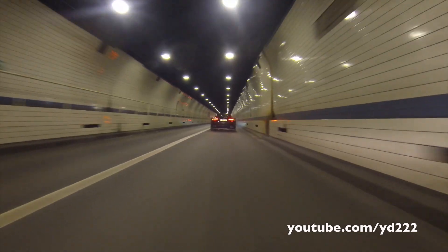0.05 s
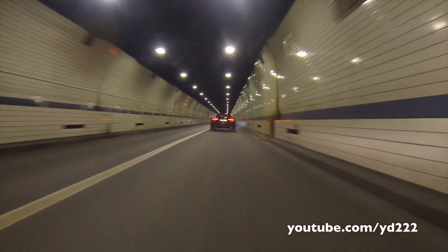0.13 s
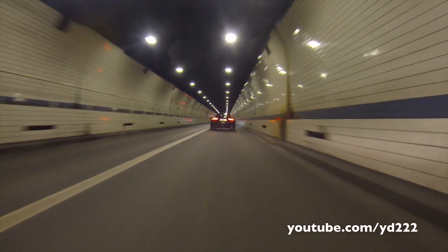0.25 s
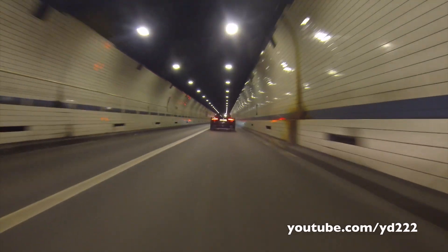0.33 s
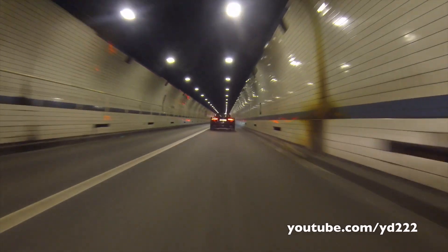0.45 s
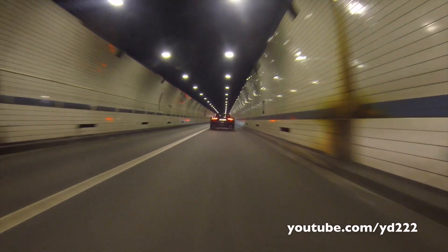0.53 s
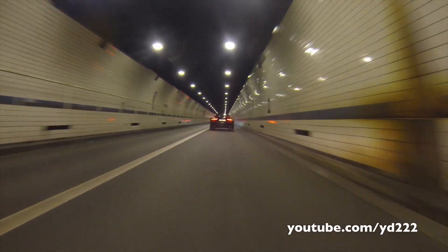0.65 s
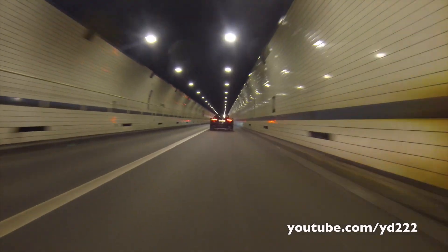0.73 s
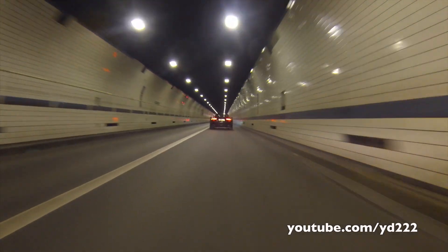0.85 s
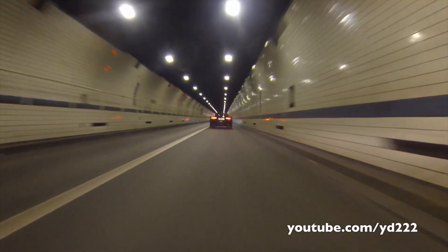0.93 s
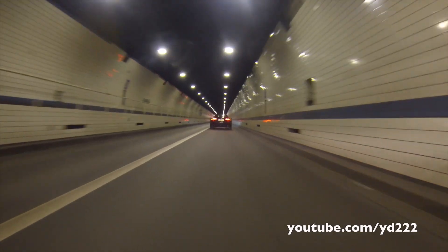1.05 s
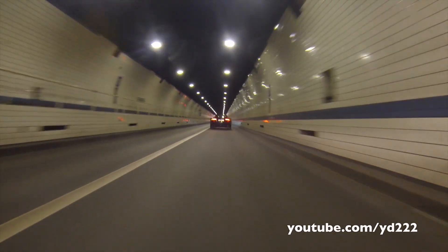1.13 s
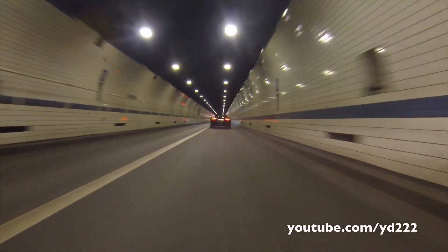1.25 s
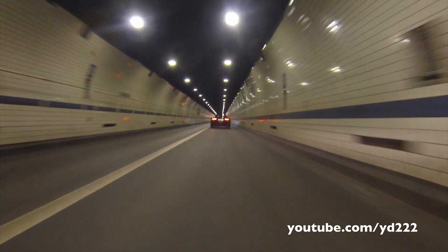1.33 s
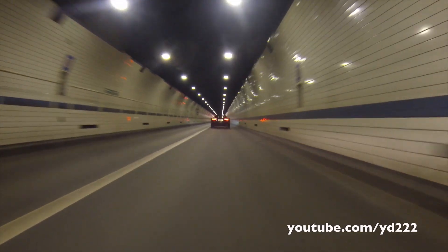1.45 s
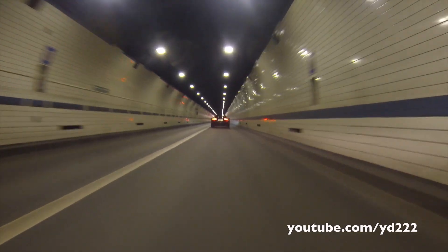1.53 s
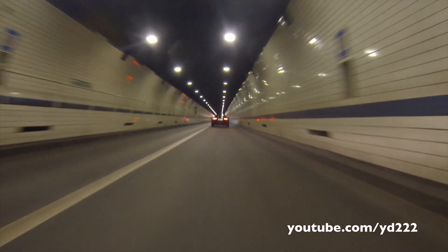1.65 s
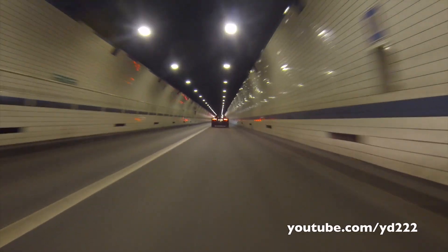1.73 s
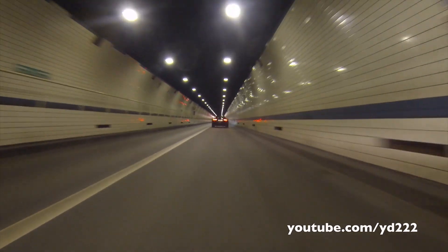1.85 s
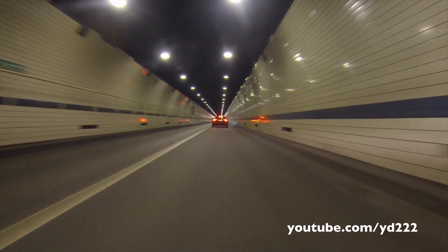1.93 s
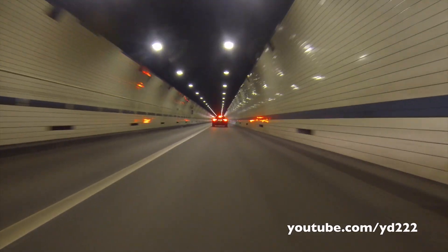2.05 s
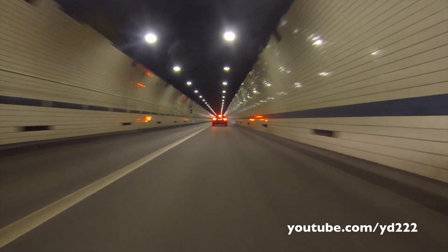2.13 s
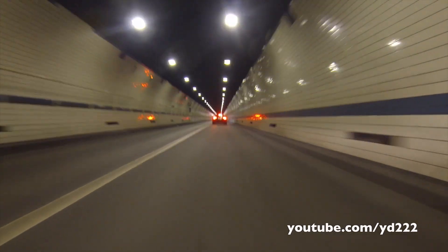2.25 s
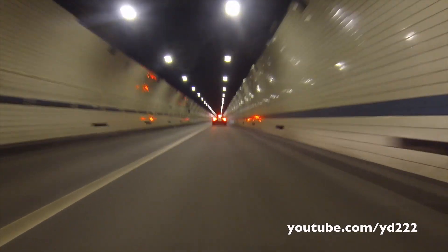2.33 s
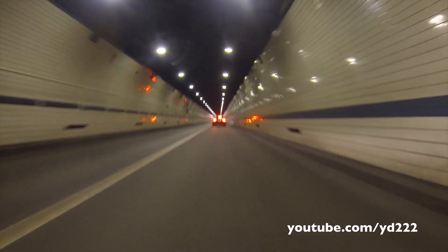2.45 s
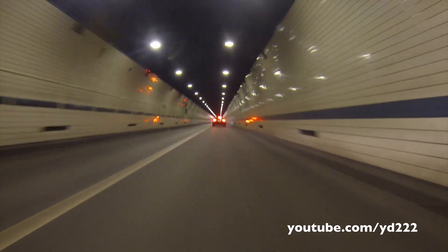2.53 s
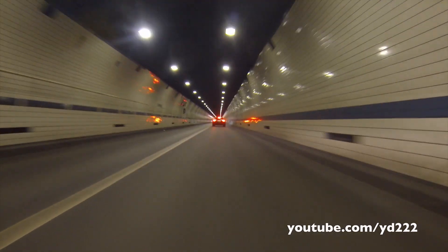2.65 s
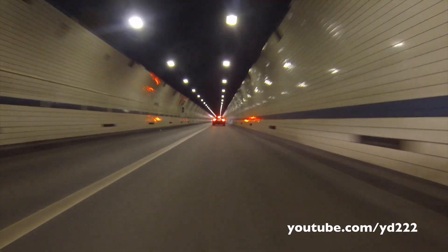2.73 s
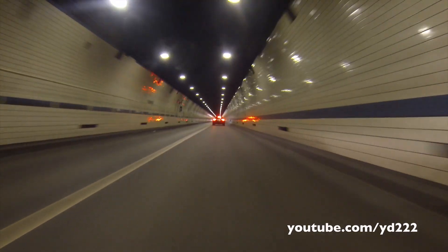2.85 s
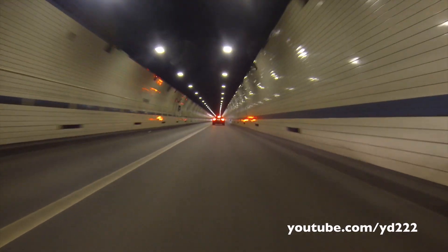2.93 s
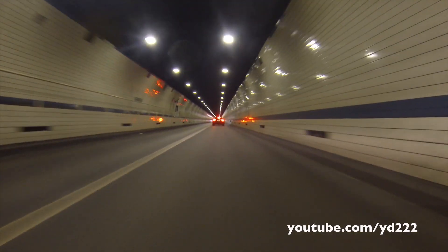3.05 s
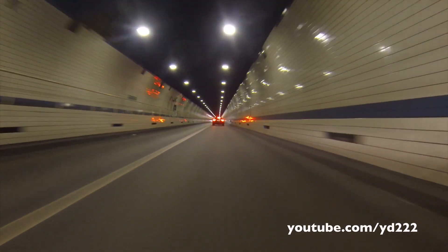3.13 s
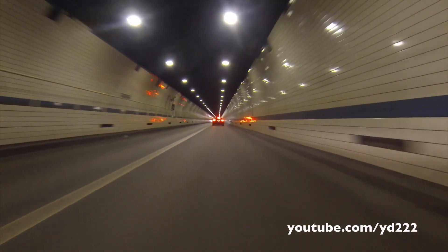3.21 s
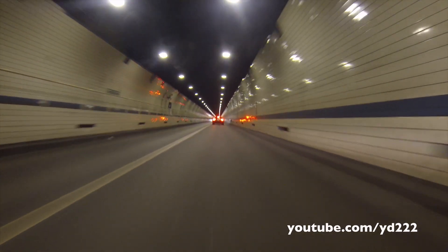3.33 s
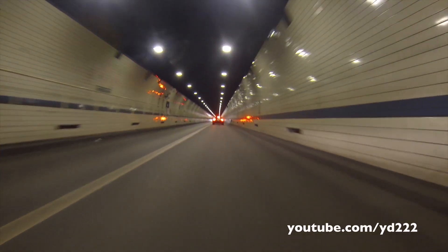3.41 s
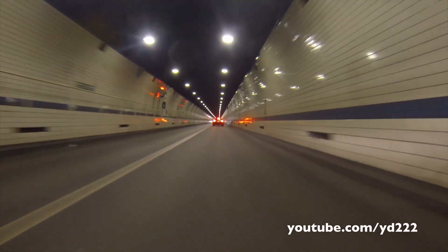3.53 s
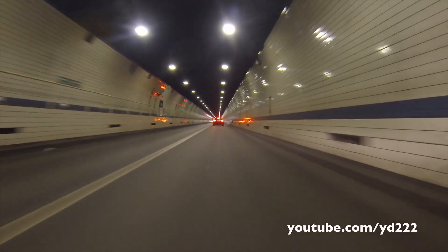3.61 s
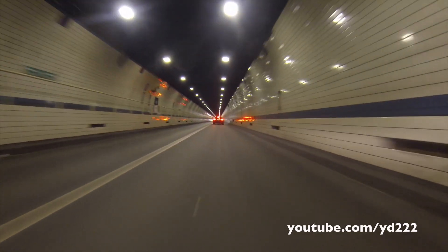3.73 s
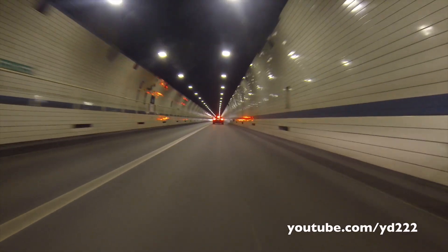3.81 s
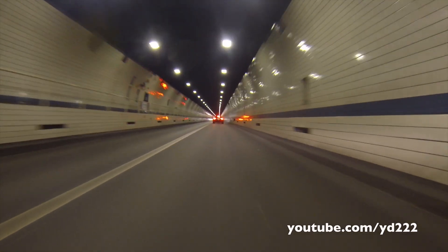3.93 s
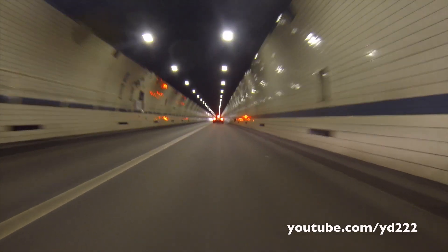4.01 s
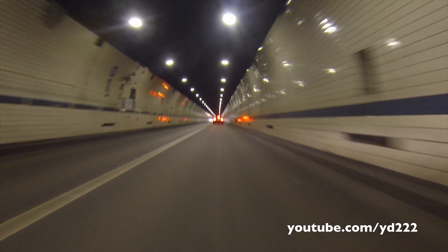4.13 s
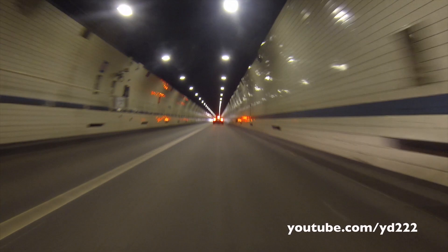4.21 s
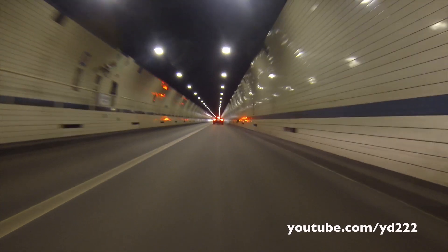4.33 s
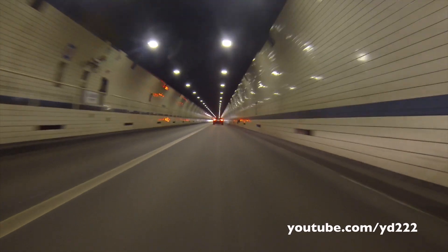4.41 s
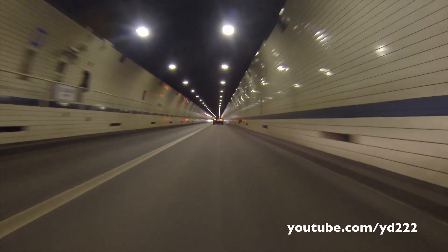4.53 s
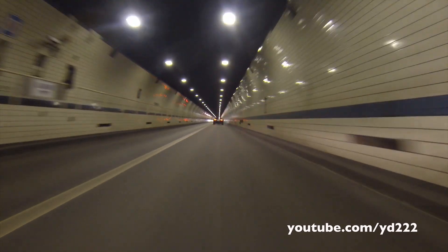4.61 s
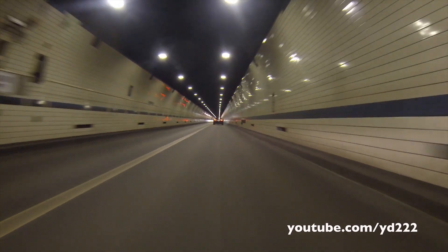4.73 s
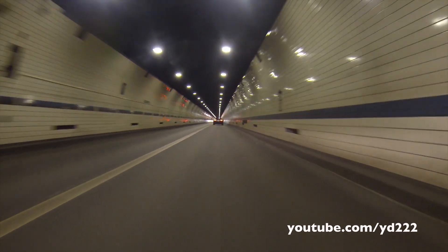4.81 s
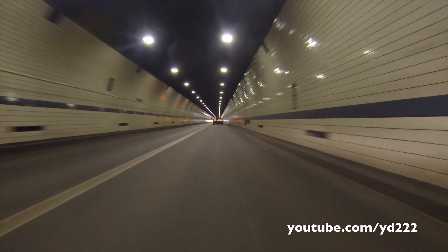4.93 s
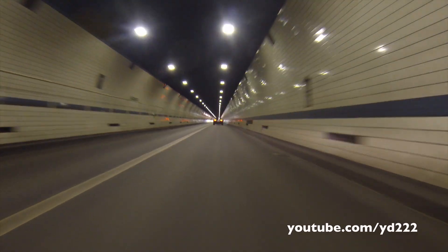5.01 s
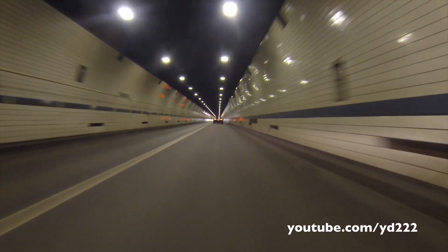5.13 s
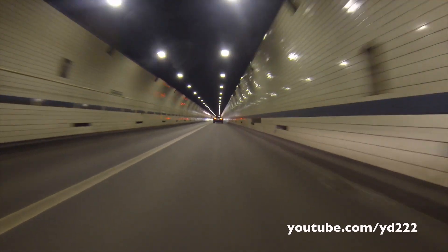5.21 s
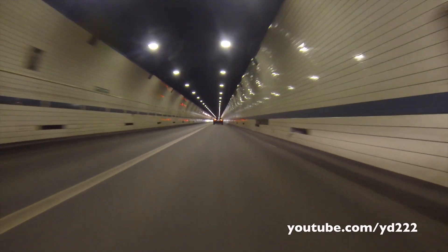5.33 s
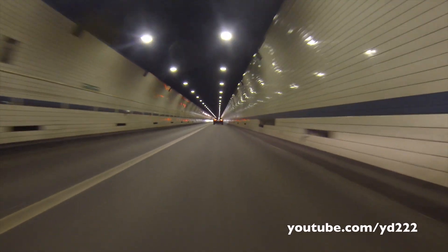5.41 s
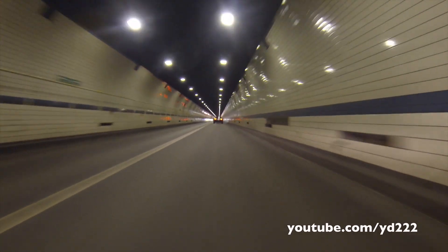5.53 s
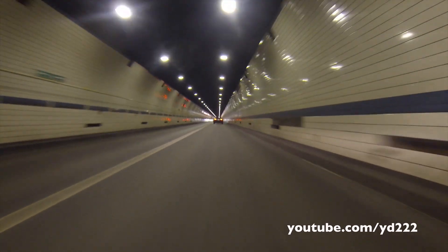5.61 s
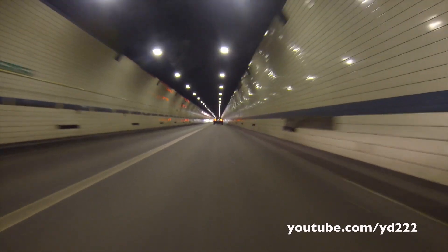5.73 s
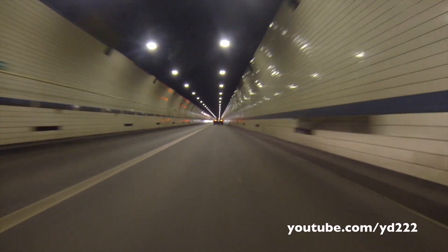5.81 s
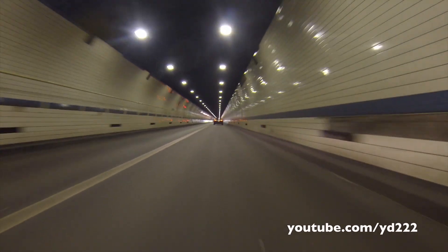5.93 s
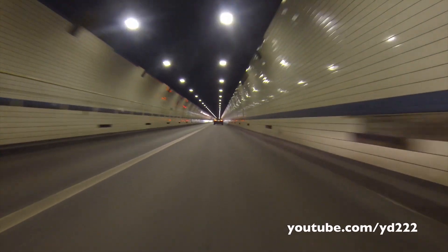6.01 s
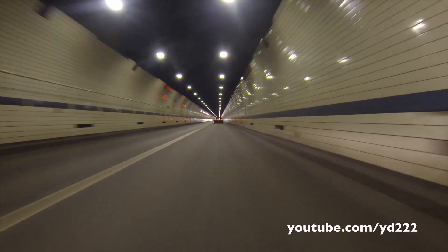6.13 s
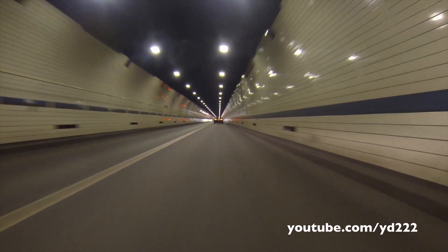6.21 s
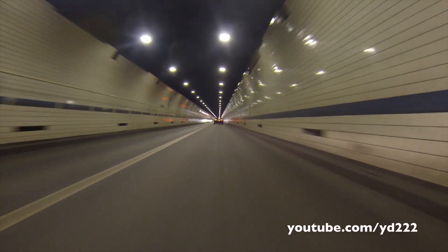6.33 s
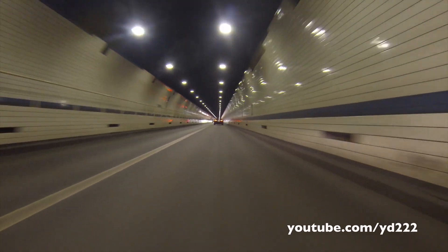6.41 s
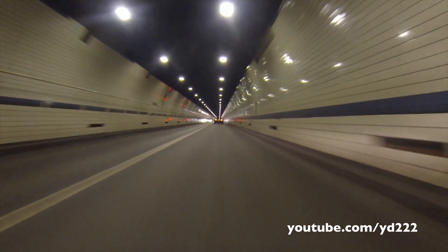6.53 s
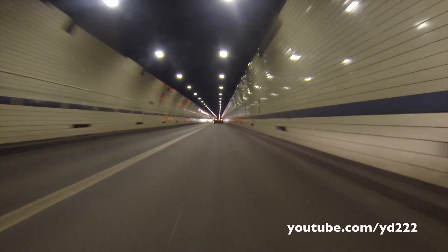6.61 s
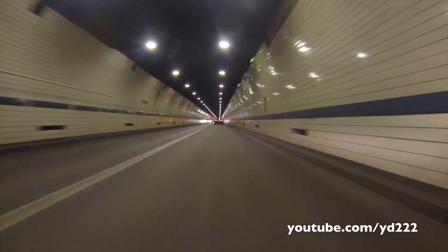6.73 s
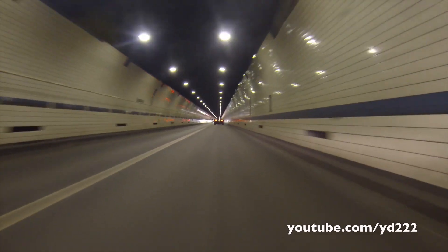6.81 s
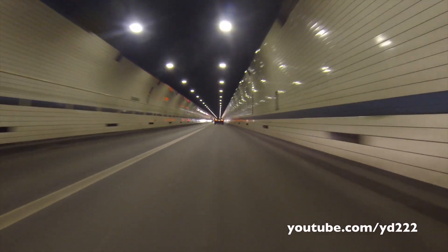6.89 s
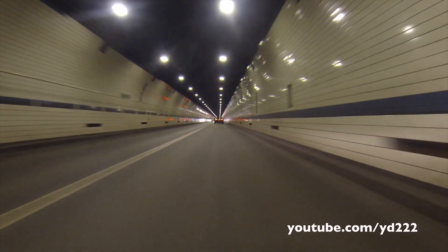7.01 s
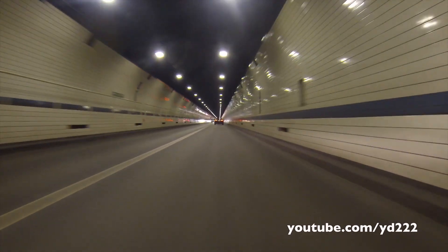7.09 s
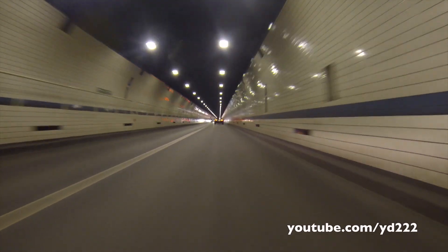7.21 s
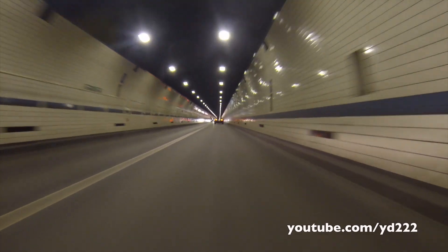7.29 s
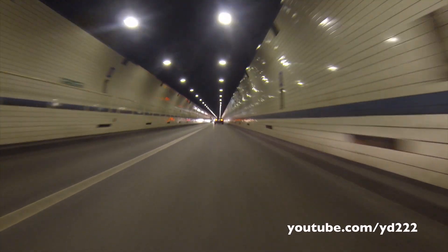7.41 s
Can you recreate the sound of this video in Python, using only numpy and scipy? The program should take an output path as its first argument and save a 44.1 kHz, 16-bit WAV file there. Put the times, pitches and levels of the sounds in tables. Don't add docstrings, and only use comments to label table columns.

```python
import sys
import numpy as np
from scipy import signal
from scipy.fft import rfft, irfft, next_fast_len
from scipy.io import wavfile
from scipy.ndimage import uniform_filter1d, map_coordinates

SR = 44100
rng = np.random.default_rng(int(sys.argv[2]) if len(sys.argv) > 2 else 0)


def ratio_of_db(decibels):
    return 10 ** (np.asarray(decibels, float) / 20)


def generate_wav(signal):
    frames = np.transpose(np.atleast_2d(signal))
    scaled = np.clip(frames, -1, 1) * 32767
    pcm = np.round(scaled).astype(np.int16)
    wavfile.write(sys.argv[1], SR, pcm)


N = 328967

# time in s, loudness in dB, harshness in dB.
EXHAUST_FLOW = [(0, -26.5, -22), (.08, -17, -15.5), (.16, -12, -13), (.33, -12.5, -9), (.57, -11.5, -12.5),
                (.88, -10, -14), (1.05, -10.5, -14), (1.16, -11, -11), (1.42, -11, -15.5), (1.52, -13, -17),
                (1.84, -12, -15.5), (2.04, -11, -14), (2.2, -13, -17.5), (2.4, -16, -19.5),
                (3.05, -25, -18), (3.8, -32.5, -18.5), (5, -45.5, -20), (7.46, -52, -20)]
# start in s, hold in s, boom level in dB.
ROAD_BUMPS = [(0.295, 0.25, -28), (.72, 0.035, -24), (0.9, .05, -23.5), (1.39, .33, -19.5),
              (2.155, 0.099, -23), (3.352, 0.39, -19.5), (3.947, 0.19, -20), (4.5, .51, -20.5),
              (5.21, 0.095, -23.5), (5.53, .11, -11), (5.922, 0.084, -17.5), (6.416, 0.15, -16.5),
              (6.708, 0.13, -20), (7.21, 0.028, -22)]


def unit(x):
    return x / np.sqrt(np.mean(x ** 2) + 1e-20)


def curves(rows):
    s, *columns = np.transpose(rows)
    t = np.arange(N) / SR
    return [np.interp(t, s, column) for column in columns]


def humps(rows):
    t = np.arange(N) / SR
    return sum(db * np.exp(-((t - s) / half_width_s) ** 2) for s, db, half_width_s in rows)


def gate(rows, fade_s):
    t = np.arange(N) / SR
    inside_s = np.minimum(t - rows[0][0], rows[-1][0] - t)
    return np.clip(inside_s / fade_s + 1, 0, 1)


def wobble(rate_hz):
    knots = rng.standard_normal(int(N * rate_hz / SR) + 4)
    return map_coordinates(knots, [np.arange(N) * rate_hz / SR])


def filtered(x, gain_of_hz):
    m = next_fast_len(N + 8192)
    hz = np.fft.rfftfreq(m, 1 / SR)
    return irfft(rfft(x, m) * ratio_of_db(gain_of_hz(hz)), m)[:N]


def coloured(x, spectrum):
    points_hz, db = np.transpose(spectrum)
    return unit(filtered(x, lambda hz: np.interp(np.log(hz + 1), np.log(points_hz), db, -120, -120)))


def rush(spectrum, patchy_db):
    z = signal.stft(rng.standard_normal(N + 512), nperseg=512)[2]
    field = uniform_filter1d(rng.standard_normal(z.shape), 5, 0)
    field = uniform_filter1d(field, 12, 1)
    noise = signal.istft(z * ratio_of_db(patchy_db * unit(field)), nperseg=512)[1][:N]
    return coloured(noise, spectrum)


def gear(speed, orders, load_db, fading_db, smear_rad):
    # time in s, firing tone in dB, other orders in dB above load_db.
    tone_levels = [(0, -28, -5), (.14, -17.5, -5.5), (.36, -27.5, -0.5), (.62, -29.5, -6.5), (.84, -21, -5),
                   (1.17, -25.5, -10.5), (1.27, -43, -7), (1.47, -22.5, -7), (1.7, -23, -4.5),
                   (1.92, -16.5, -2), (2.12, -18, -3.5), (2.4, -28, -5), (2.7, -38, -13.5), (3.2, -39, -5),
                   (3.8, -36, 7), (5.0, -39.5, -1.5), (5.6, -29, -3), (7.46, -30, 1)]
    # time in s, depth in dB, half width in s.
    nulls = [(.08, 18, 0.03), (.52, 9, 0.053), (1.44, 4, 0.028), (1.68, 0, 0.028), (1.88, 21, 0.022),
             (2.0, 20, 0.035), (2.2, 20, 0.045), (2.62, 8, 0.054), (3.67, 11, 0.056), (4.01, 5, 0.091),
             (4.41, 7, 0.039), (4.91, 5, 0.033), (5.16, 15, 0.042), (5.95, 21, 0.083), (6.46, 15, 0.11),
             (6.78, 11, 0.037), (7.29, 3.5, 0.29)]
    # frequency in Hz, gain in dB.
    case_lift = [(900, -1.5), (1000, -8), (1080, 7), (1150, 6.5), (1300, 1.5), (1450, 10.5), (1650, 0),
                 (1800, -3)]
    focused_orders = [18, 14, 10, 12, 12, 10, 16, 15, 22, 23, 27]
    # time in s, gain in dB, half width in s.
    focus = [(.32, 3.8, 0.12), (.4, 5, 0.12), (.3, 7.1, 0.17), (.56, 5.6, .1), (2.4, 4, 0.16),
             (5.0, 16, .35), (6.7, 13, .22), (7.1, 17, .25), (.62, 5, .15), (.55, 5, .12), (1.95, 5, .15)]
    (cycle_hz,), (firing_db, others_db) = curves(speed), curves(tone_levels)
    turn = 2 * np.pi * np.cumsum(cycle_hz) / SR
    firing_gain = ratio_of_db(firing_db - humps(nulls) + 2.6 * wobble(16))
    firing = firing_gain * np.sqrt(2) * np.sin(8 * turn + 0.5 * wobble(17))
    others = np.zeros(N)
    for order, db in orders:
        case_db = np.interp(order * cycle_hz, *np.transpose(case_lift))
        focus_db = humps([row for k, row in zip(focused_orders, focus) if k == order])
        gain = ratio_of_db(db + case_db + fading_db * wobble(5) + focus_db)
        blur = smear_rad * np.sqrt(order) * wobble(14)
        others += gain * np.sin(order * turn + blur + rng.uniform(0, 2 * np.pi))
    tones = (firing + ratio_of_db(load_db + others_db) * others) * gate(speed, 0.037)
    return tones, np.cos(8 * turn) * gate(speed, 0.054)


def flow_drone_db():
    loud_db = curves(EXHAUST_FLOW)[0]
    return -17.5 + 0.68 * (loud_db + 11)


def engine():
    # time in s, four-stroke cycles in Hz.
    low_speed = [(0, 46.6), (.22, 50.1), (.45, 50.3), (.6, 51.7), (.8, 56.6), (.95, 58.5), (1.08, 59.7),
                 (1.15, 56.6), (1.28, 55)]
    high_speed = [(1.3, 37.6), (1.5, 37.5), (1.6, 38.6), (1.9, 40.6), (2, 40), (2.15, 39.6), (2.35, 40.4),
                  (3.15, 40)]
    coast_speed = [(3.2, 35.5), (3.8, 32), (4.2, 31.4), (4.5, 29.8), (4.9, 28.8), (5.5, 28.4), (6.7, 27),
                   (7.46, 25.8)]
    # multiple of the cycle, level in dB.
    low_orders = [(2, -22), (5, -6), (6, -7), (7, -12.5), (10, -3.5), (11, -26), (12, -1), (13, -18),
                  (14, 1), (15, -2), (16, -1), (17, -8.5), (18, -1), (19, -23), (20, 1.5), (21, -12),
                  (22, -1.5), (23, -1), (24, -1.5), (25, -12), (26, -9.5), (28, -4.5), (29, -8), (30, -16),
                  (32, -4.5), (36, -16), (40, -2.5), (44, -8.5), (46, -13.5), (48, -17)]
    high_orders = [(2, -14), (4, -1), (6, -10.5), (9, -16), (10, -24), (12, -4.5), (13, -9.5), (14, -9.5),
                   (16, -2.5), (18, -4.5), (19, -12), (20, -5.5), (22, -7), (24, -14), (26, 2.5),
                   (27, -3.5), (28, -4.5), (29, -14.5), (30, -21), (32, -21.5), (35, -8.5), (36, -21)]
    coast_orders = [(4, 0), (10, -2.5), (11, -8.5), (15, -5.5), (16, -8)]
    drone_db = flow_drone_db()
    low, low_beat = gear(low_speed, low_orders, drone_db - 2.5, fading_db=2, smear_rad=0.075)
    high, high_beat = gear(high_speed, high_orders, drone_db - 1.5, fading_db=3, smear_rad=0.1)
    coast, _ = gear(coast_speed, coast_orders, -45, fading_db=2.5, smear_rad=0.17)
    return low + high + coast, 1 + 0.15 * (low_beat + high_beat)


def blast(beat):
    # frequency in Hz, density in dB per Hz.
    drone_spectrum = [(120, -36.5), (180, -3.5), (400, -2.5), (700, 0.5), (950, -5.5), (1300, -48)]
    roar_spectrum = [(800, -45), (975, -14), (1060, 2), (1150, 3.5), (1300, -8.5), (1450, -0.5), (1620, -8),
                     (1780, -13.5), (2100, -18), (2800, -60)]
    rasp_spectrum = [(1500, -42), (1900, -3.5), (2400, -3), (3500, -14), (4200, -20), (4900, -15.5),
                     (5500, -28.5), (6200, -62)]
    fizz_spectrum = [(4800, -29.5), (5700, 1), (7000, -4.5), (8000, -8.5), (9500, -6.5), (11000, -14),
                     (12000, -15), (14000, -22.5), (15000, -35), (16500, -71)]
    # time in s, fizz gain in dB, half width in s.
    flares = [
        (.29, 2.5, .04),
        (.94, 5, .015),
        (.977, 12, .017),
        (1.13, -0.5, .04),
    ]
    loud_db, harsh_db = curves(EXHAUST_FLOW)
    flare_db = humps(flares)
    rasp_db = loud_db + harsh_db + 0.45 * flare_db + 0.6
    fizz_db = -49.5 + 0.99 * (loud_db + 11) + 1.4 * (harsh_db + 13) + flare_db
    drone = ratio_of_db(flow_drone_db() - 3.5) * rush(drone_spectrum, patchy_db=1.25)
    roar = ratio_of_db(loud_db - 2.5) * rush(roar_spectrum, patchy_db=0.77)
    rasp = ratio_of_db(rasp_db) * unit(beat * rush(rasp_spectrum, patchy_db=1.0))
    fizz = ratio_of_db(fizz_db) * unit(beat * rush(fizz_spectrum, patchy_db=1.5))
    return drone + roar + rasp + fizz


def tunnel(x, t60_s):
    t = np.arange(int(1.2 * SR)) / SR
    tail = rng.standard_normal(len(t)) * ratio_of_db(-60 * t / t60_s)
    return signal.fftconvolve(x, tail / np.linalg.norm(tail))[:N]


def exhaust():
    tones, beat = engine()
    return tones + ratio_of_db(-6.0) * tunnel(tones, t60_s=0.73) + blast(beat)


def clicks():
    # time in s, peak in dB.
    click_events = [(.2657, -24.5), (.2806, -25.5), (.286, -22), (.2895, -28), (.2974, -22), (.3025, -27),
                    (.3305, -30), (.3826, -24.5), (.4027, -37), (.4272, -26.5), (.4708, -30), (.5172, -30),
                    (.5541, -25.5), (.6179, -29.5), (.7569, -30.5), (.796, -24.5), (.7991, -27.5),
                    (.9321, -33.5), (.943, -26), (0.9663, -16), (.9735, -26), (.979, -25.5), (1.0015, -27),
                    (1.0037, -24.5), (1.1106, -33.5), (1.6755, -34), (1.9023, -37), (2.0266, -33)]
    # frequency in Hz, density in dB per Hz.
    snap_spectrum = [(2500, -43), (4500, -6), (6500, 3), (9500, -2), (12000, -5.5), (15500, -13),
                     (17000, -53)]
    out = np.zeros(N)
    for s, db in click_events:
        sign, echo = rng.uniform(-1, 1, 2)
        pair = np.sign(sign) * np.array([1, 0.6 * echo])
        out[round(s * SR) + np.array([0, 5])] += ratio_of_db(db) * pair
    return ratio_of_db(4.5) * out.std() * coloured(out, snap_spectrum)


def body_boom():
    boom_hz, idle_db, rise_db_per_s, fall_db_per_s = 27.5, -29.5, 220, 115
    t = np.arange(N) / SR
    swell_db = np.full(N, idle_db)
    for s, hold_s, db in ROAD_BUMPS:
        drop_db = np.maximum(rise_db_per_s * (s - t), fall_db_per_s * (t - s - hold_s))
        swell_db = np.maximum(swell_db, db - np.maximum(0, drop_db))
    phase = 2 * np.pi * boom_hz * t + 0.93 * wobble(5)
    return ratio_of_db(swell_db + 1.6 * wobble(7.6)) * np.sqrt(2) * np.sin(phase)


def hum():
    # frequency in Hz, rms level in dB.
    hum_tones = [
        (13, -40),
        (56, -25.5),
    ]
    t = np.arange(N) / SR
    out = np.zeros(N)
    for hz, db in hum_tones:
        phase = 2 * np.pi * hz * t + 0.62 * wobble(3.4)
        out += ratio_of_db(db + 1.1 * wobble(4)) * np.sqrt(2) * np.sin(phase)
    return out


def rumble():
    # frequency in Hz, density in dB per Hz.
    rumble_spectrum = [(5, -17.5), (12, 3), (30, 0), (41, 8), (66, -7), (82, 2), (100, -3), (130, 3.5),
                       (165, -4.5), (195, -12), (300, -16), (450, -56.5)]
    thud_db, thud_half_width_s = -0.5, 0.026
    rumble_db = -27 + humps([(s, thud_db, thud_half_width_s) for s, _, _ in ROAD_BUMPS])
    return ratio_of_db(rumble_db + 3.0) * rush(rumble_spectrum, patchy_db=0.5)


def tyres():
    # frequency in Hz, density in dB per Hz.
    tyre_spectrum = [(150, -29), (250, -7.5), (330, -12), (500, -13.5), (820, -12), (1100, -0.5),
                     (1400, -0.5), (2000, -13.5), (3000, -24), (4200, -32.5), (4900, -31.5), (5700, -41.5),
                     (8200, -48), (13600, -61.5), (14800, -78)]
    # time in s, level in dB.
    tyre_level = [(0, -27.5), (3, -27), (7.46, -27.5)]
    return ratio_of_db(curves(tyre_level)[0]) * rush(tyre_spectrum, patchy_db=0.5)


def case(x):
    # centre in Hz, width in Hz, gain in dB.
    ripples = [(1980, 17, 4), (2355, 100, 3), (2925, 77, 3), (3364, 63, 5), (4030, 40, 1.5), (4600, 90, 1),
               (5000, 100, 0.5), (7200, 83, 1), (7870, 90, -6.5), (9400, 80, 3.5), (9800, 70, 2),
               (11700, 200, 2)]
    return filtered(x, lambda f: sum(db * np.exp(-0.5 * ((f - hz) / width_hz) ** 2)
                                     for hz, width_hz, db in ripples))


def scene():
    ride = body_boom() + hum() + rumble() + tyres()
    return (case(exhaust() + ride) + clicks())[None]


def roll_off(x):
    return signal.sosfilt(signal.butter(12, 15720, fs=SR, output="sos"), x)


def record(dry):
    top = 0.99
    clipped = dry / (1 + np.abs(dry / top) ** 7) ** (1 / 7)
    return roll_off(clipped)


dry = scene()
out = record(dry)
generate_wav(out)
```